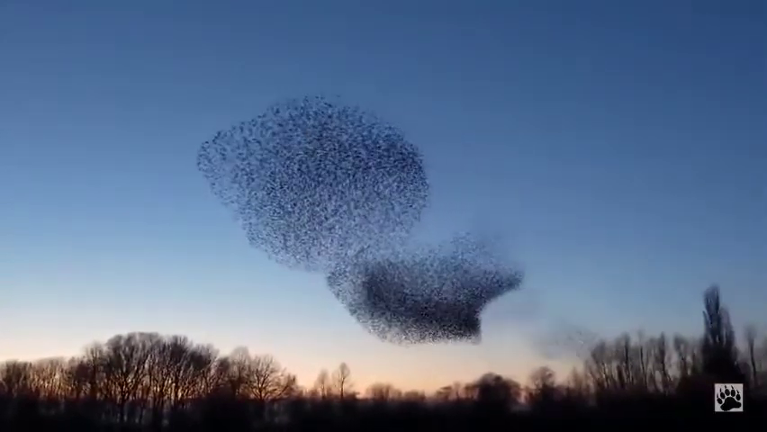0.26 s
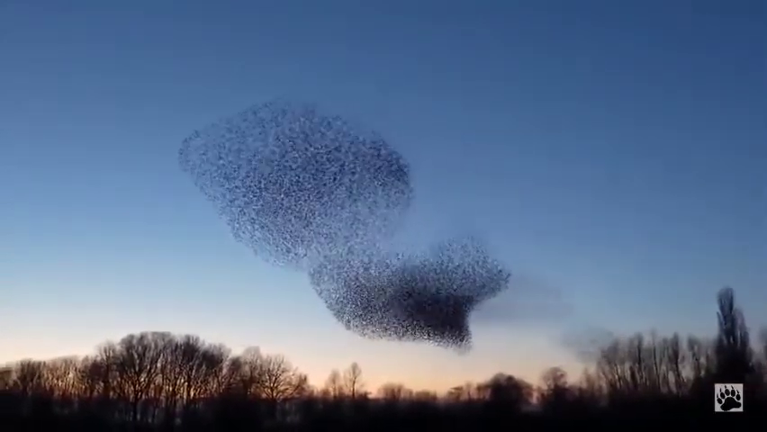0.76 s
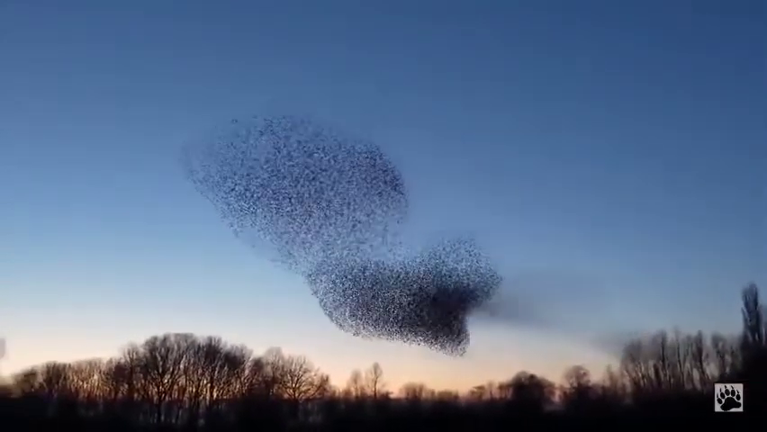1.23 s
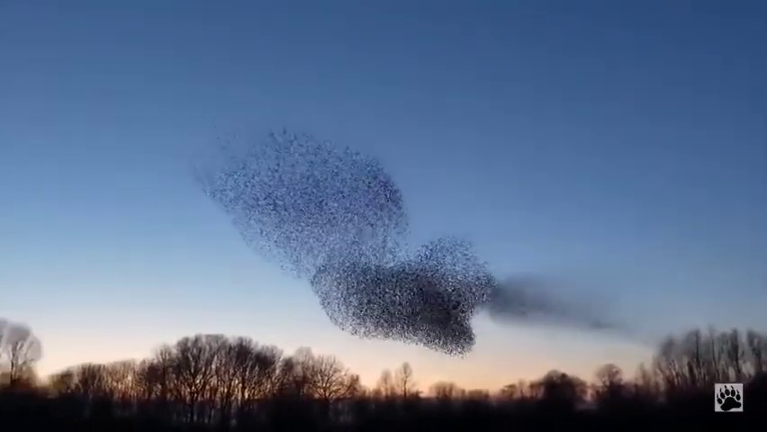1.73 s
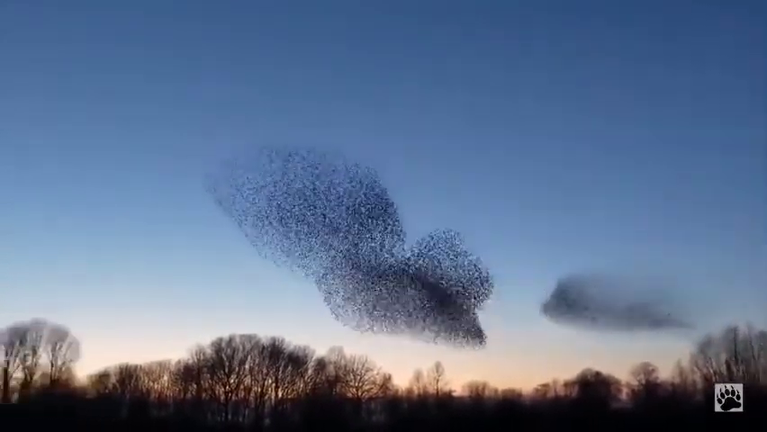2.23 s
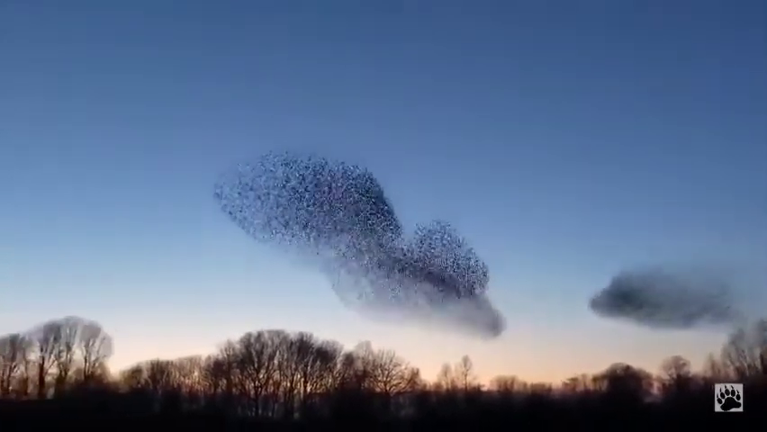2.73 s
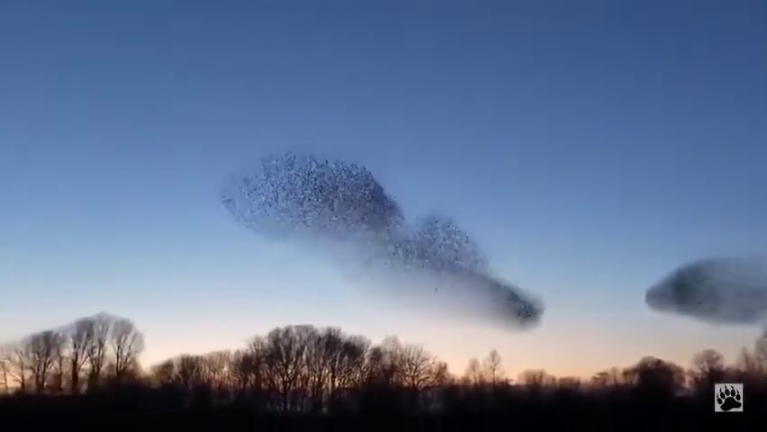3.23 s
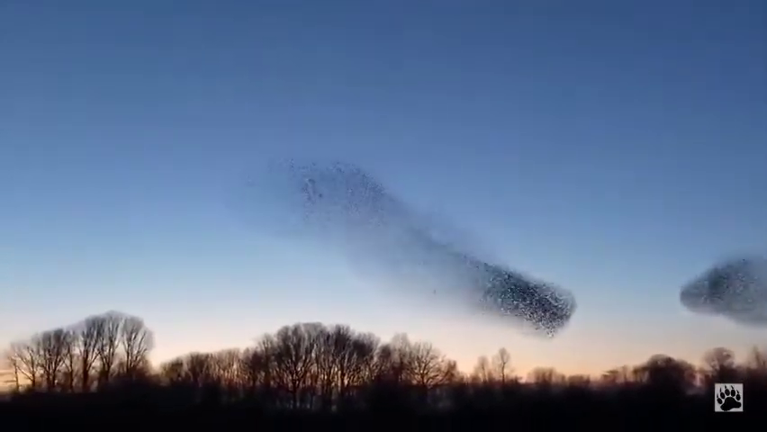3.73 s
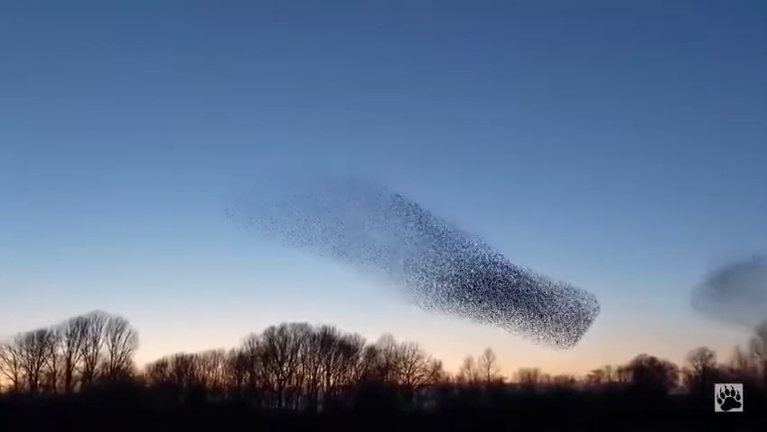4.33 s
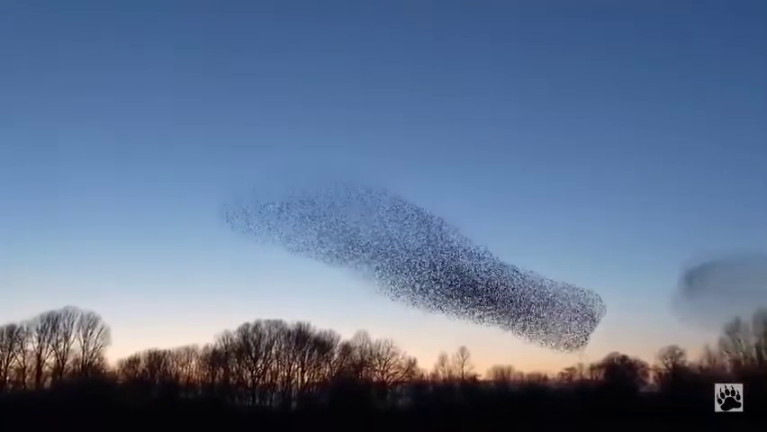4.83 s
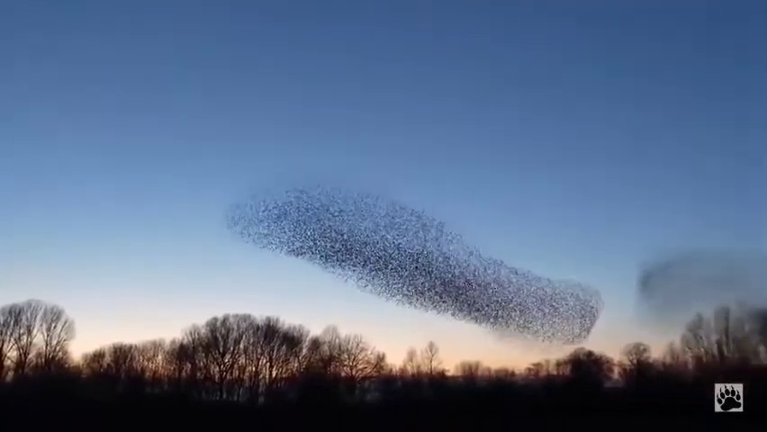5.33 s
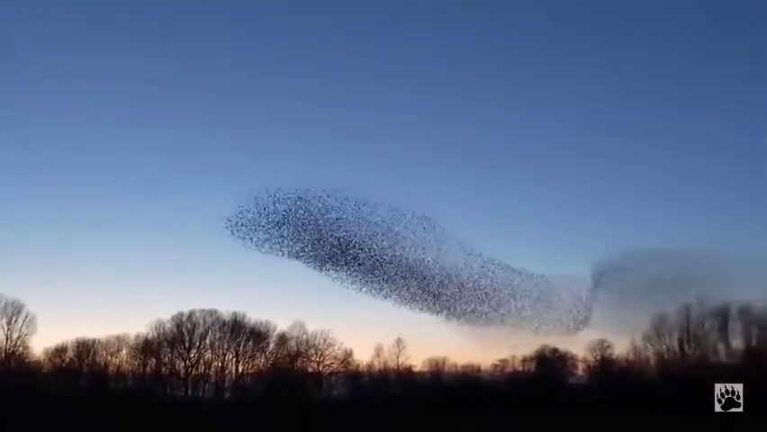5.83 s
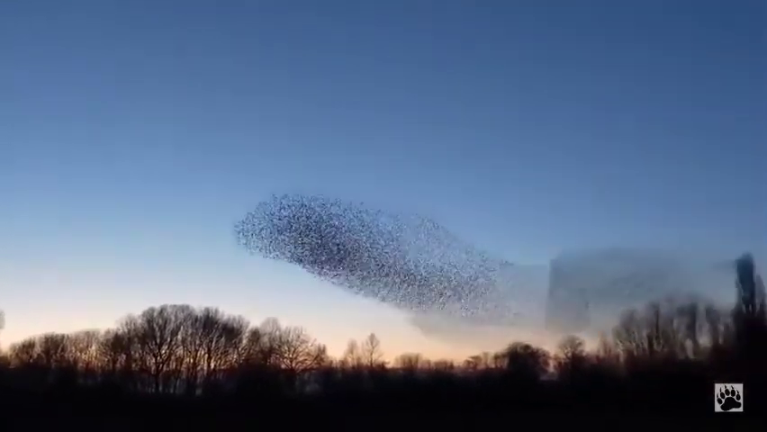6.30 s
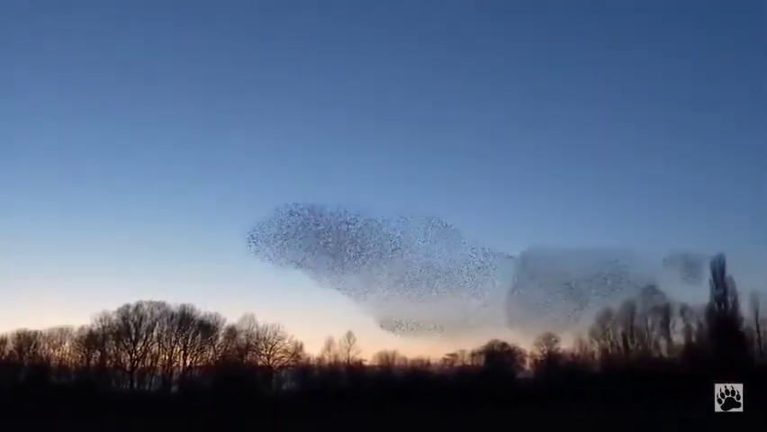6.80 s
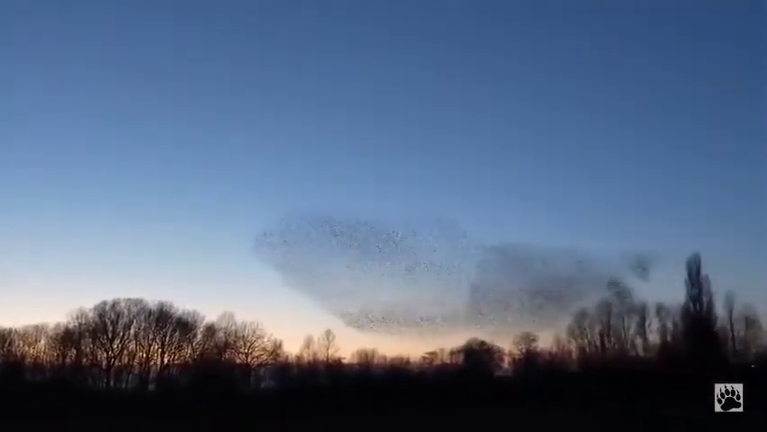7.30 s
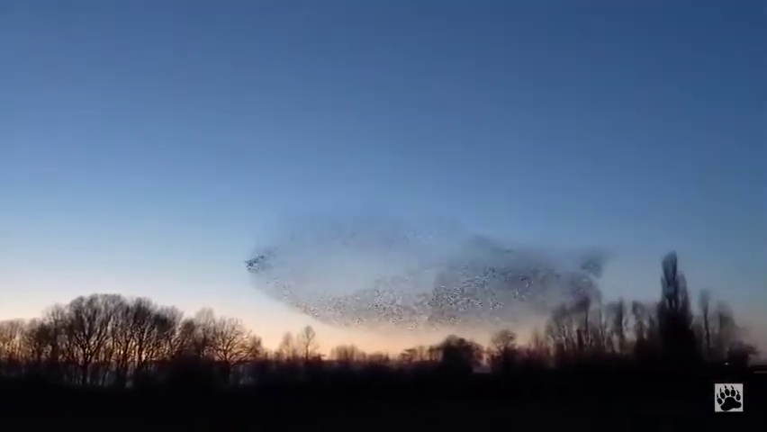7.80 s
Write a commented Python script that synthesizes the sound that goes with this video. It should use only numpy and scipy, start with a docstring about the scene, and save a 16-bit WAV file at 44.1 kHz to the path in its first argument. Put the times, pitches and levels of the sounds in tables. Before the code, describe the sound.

Outdoors by trees at dusk, a large starling flock keeps up a dense, wavering twitter. Nearer birds open with harsh high buzzes and short whistles, then sliding whistles and occasional squawks. Around two and a half seconds a fast dry rattle runs for half a second. More buzzes, warbles and bill ticks follow. A faint hiss of wings and leaves lies underneath, with a short scattered tree echo and a small microphone's thin bass.

```python
"""A field at dusk, beside a roost of starlings. Near birds whistle, buzz, rattle, squawk and tick.
Whistles are gliding tones, buzzes are pulsed tones, squawks are stacks of harmonics and ticks are noise snaps.
Thousands of far calls blur into chatter over a soft rush of wings and leaves and bands of air noise.
Trees return a short scattered echo, made with a decaying tail of noise."""
import sys
import numpy as np
from scipy import signal
from scipy.fft import rfft, irfft, next_fast_len
from scipy.io import wavfile
from scipy.ndimage import uniform_filter1d

SR = 44100
rng = np.random.default_rng(int(sys.argv[2]) if len(sys.argv) > 2 else 0)


def materialize(psi):
    """Save the field psi as 16-bit PCM at rate SR to the path in sys.argv[1].

    A 1-D psi becomes a single channel; in a 2-D psi each row is a channel.
    """
    bounded = np.clip(np.atleast_2d(psi).T, -1, 1)
    quanta = np.round(bounded * 32767).astype(np.int16)
    wavfile.write(sys.argv[1], SR, quanta)


N = 355225  # length in samples, about 8 s

# round high chips of the rattle: (t/s, level/dB before each chip's own trim, f/Hz)
HIGH_CHIPS = [(2.5072, -26, 4370), (2.5184, -26, 4530), (2.5488, -28, 4640), (2.5726, -28, 4490),
              (2.5995, -30, 5370), (2.6304, -25, 4680), (2.6559, -22.5, 4860), (2.6868, -26, 4600),
              (2.714, -25, 5390), (2.741, -22, 4600), (2.7697, -25, 4730), (2.796, -30, 4630),
              (2.829, -24, 4640), (2.8594, -32, 4630), (2.8858, -33, 4900), (2.9188, -33, 4700),
              (2.9452, -34, 5270), (2.9754, -32, 4510), (3.0006, -31, 4320), (3.0404, -33.5, 4200)]
# steep low sweeps between them: (t/s, level/dB before each chip's own trim, f/Hz before each chip's own shift)
LOW_CHIPS = [(2.5311, -25, 4020), (2.558, -27.5, 4050), (2.586, -29.5, 3470), (2.616, -26, 4270),
             (2.6444, -31, 4040), (2.6735, -24.5, 4100), (2.701, -27, 3600), (2.7312, -26, 4260),
             (2.759, -28, 4100), (2.788, -29, 3520), (2.817, -30, 4060), (2.8457, -33, 3540),
             (2.874, -30, 3440), (2.9048, -27.5, 4000), (2.9334, -32, 3710), (2.9637, -34, 4080),
             (2.9933, -32, 3520), (3.0244, -34, 4200)]


def undb(db):
    """Turn decibels into a plain multiplier."""
    return 10 ** (np.asarray(db) / 20)


def level(x, db):
    """Scale a sound to an rms level in dB."""
    return x * undb(db) / np.sqrt(np.mean(x ** 2))


def walk(rate):
    """A smooth random wander: levels held for 1 / rate seconds, smoothed twice, with a spread near 1."""
    hold = max(int(SR / rate), 2)
    steps = np.repeat(rng.standard_normal(N // hold + 1), hold)
    smooth = uniform_filter1d(uniform_filter1d(steps, hold), hold)
    return 1.316 * smooth[:N]


def colour(x, points):
    """Make some pitches louder and others softer, following (Hz, dB) points."""
    hz, db = np.transpose(points)
    size = next_fast_len(N)
    bins = np.arange(size // 2 + 1) * SR / size + 1  # the + 1 avoids log(0)
    gain = undb(np.interp(np.log(bins), np.log(hz), db))
    return irfft(rfft(x, size) * gain, size)[:N]


def add(out, start, x):
    """Mix x in at a time in seconds."""
    i = max(int(start * SR), 0)
    out[i:i + len(x)] += x[:max(N - i, 0)]


def sine(hz, turn=0.):
    """Tone of rms 1 that follows a pitch curve; turn is its starting point in the cycle."""
    return np.sqrt(2) * np.sin(2 * np.pi * (np.cumsum(hz) / SR + turn))


def arch(size, edge):
    """Loudness shape with rounded ends; a small edge gives a flat top."""
    return np.sin(np.pi * (np.arange(size) + .5) / size) ** edge


def arc(u, first, middle, last):
    """Parabola through three values at u = 0, .5 and 1."""
    return first * (1 - u) * (1 - 2 * u) + middle * 4 * u * (1 - u) + last * u * (2 * u - 1)


def chip(hz, length, rise, turn=0., bend=np.zeros(SR)):
    """A short tone, peak 1, sliding by the fraction rise each side of hz; bend adds an unsteady pitch."""
    u = np.linspace(-1, 1, int(length * SR))
    tone = sine(hz * (1 + rise * u + bend[:len(u)]), turn)
    return tone * arch(len(u), 0.96) / np.sqrt(2)


def band_noise(hz, ratio):
    """Noise from hz / ratio to hz * ratio, fading on both sides."""
    edges = [(hz / ratio ** 2, -50), (hz / ratio, -3), (hz, 0), (hz * ratio, -3), (hz * ratio ** 2, -50)]
    return colour(rng.standard_normal(N), edges)


def whistles():
    """Each whistle is one gliding, nearly pure tone whose pitch and strength tremble."""
    # simple whistles, one arc each:
    # (t/s, length/s, first f/Hz, middle f/Hz, last f/Hz, level/dB, swell from start to end/dB)
    simple_whistles = [ (0.0, 0.023, 2600, 2640, 2600, -43, -6), (0.038, 0.068, 2780, 3000, 3220, -41, 0),
                       (4.17, .06, 4550, 4650, 4750, -47, -6), (.119, 0.058, 2240, 2220, 2550, -37, 2),
                       (0.435, 0.1, 1770, 1734, 1850, -39, -3), (0.514, 0.025, 2800, 2755, 2770, -33, 1),
                       (0.893, 0.035, 5460, 5500, 5800, -43.5, 0), (0.933, 0.066, 6250, 6200, 5500, -47, 1),
                       (0.79, .035, 2800, 2780, 2770, -48, -6), (1.124, 0.092, 4000, 3900, 4020, -52.5, 22),
                       (1.255, 0.13, 3480, 3360, 3320, -53, 2),
                       (1.664, 0.076, 5800, 5560, 5260, -41.5, -23),
                       (1.673, 0.073, 2630, 2650, 2680, -48, 0), (1.757, 0.058, 2563, 2630, 2600, -39, -20),
                       (1.842, 0.09, 3710, 3730, 3550, -43, -3), (1.88, 0.035, 2850, 3030, 2850, -34.5, -2),
                       (1.948, 0.046, 1885, 1946, 1990, -41, 10),
                       (2.056, 0.056, 3970, 3970, 3640, -51, -14), (1.95, 0.13, 2620, 2800, 2800, -51, 0),
                       (2.06, 0.048, 2830, 2900, 2740, -42.5, -6), (2.4, 0.17, 1147, 1118, 1140, -50, 4),
                       (2.536, 0.084, 6330, 6200, 6000, -41, 2), (2.655, 0.115, 5750, 6000, 5850, -39.5, 1),
                       (2.782, .045, 5750, 5680, 5600, -47, -2), (2.829, 0.064, 5770, 5910, 6030, -38, 15),
                       (2.908, .075, 5700, 5520, 5310, -45, 8), (2.818, 0.24, 2167, 1905, 1740, -44.5, -12),
                       (3.351, 0.059, 2880, 2330, 1890, -43.5, 4), (3.59, 0.21, 1740, 1876, 1740, -45, 0),
                       (3.888, .04, 5200, 5620, 6000, -52, -12),
                       (4.302, 0.064, 4400, 3960, 3730, -44.5, -4),
                       (4.494, 0.074, 5880, 5730, 5500, -43.5, -18),
                       (4.257, 0.039, 2680, 2380, 2220, -30, -1), (4.302, .11, 5100, 5200, 4770, -51, -4),
                       (5.15, 0.19, 1257, 1044, 810, -50, 12), (3.1, 0.2, 1153, 1082, 944, -51, -2),
                       (5.23, .04, 4320, 4600, 5200, -48, 8), (5.16, 0.15, 5350, 5480, 5630, -49.5, 4),
                       (5.278, 0.04, 2950, 2500, 2230, -36, 0), (5.423, 0.059, 2300, 4300, 4970, -48, -4),
                       (5.438, 0.16, 6060, 5920, 5770, -40.5, 3),
                       (5.546, 0.042, 6150, 6200, 5780, -38.5, -2),
                       (5.81, 0.11, 5750, 4940, 4670, -51.5, -8),
                       (5.871, 0.017, 3000, 3600, 4280, -41.5, -2),
                       (5.997, 0.038, 3080, 3190, 3000, -44.5, -17),
                       (6.198, 0.23, 3300, 3430, 3520, -53.5, -15),
                       (6.572, 0.031, 3200, 3260, 3300, -44.5, -4),
                       (6.63, 0.073, 1970, 1864, 1710, -37, -3),
                       (6.711, 0.028, 2580, 3200, 3800, -44.5, -14),
                       (7.087, 0.059, 5350, 5150, 4280, -45.5, 9), (7.238, 0.07, 8150, 7160, 6240, -54, -9),
                       (7.378, 0.12, 1610, 1745, 1770, -49, -1), (7.744, 0.076, 5300, 5050, 4530, -48, -3),
                       (7.93, 0.13, 1574, 1936, 2150, -42, 6), (8.025, .03, 4060, 4230, 4150, -43.5, 2),
                       (2.03, 0.038, 2170, 1945, 1750, -41.5, -2), (2.135, 0.068, 1753, 1610, 1770, -45, 5),
                       (2.38, .26, 1796, 1873, 1947, -47, -6), (2.45, 0.095, 2250, 2390, 2560, -50, -6),
                       (7.53, 0.067, 1140, 1088, 1010, -47.5, 0), (7.845, 0.037, 4420, 4870, 4850, -45, -2),
                       (.162, .032, 7450, 7450, 7350, -41, 6), (3.235, .09, 3850, 4080, 4650, -46, 4),
                       (1.06, 0.045, 3620, 2890, 2080, -48, 8), (7.035, .08, 2690, 2710, 2700, -54, 2),
                       (4.01, 0.045, 3750, 3720, 3760, -48, 0), (1.379, 0.087, 2100, 2680, 2580, -46, 1),
                       (1.55, .04, 3450, 3330, 3220, -43, 0), (1.722, .035, 4430, 4250, 4000, -46, -2),
                       (4.587, .02, 3400, 3000, 2650, -50, 0)]
    # winding whistles and a warble, one list of points each: (t/s, f/Hz, level/dB)
    phrases = [
        [(.296, 1840, -40), (.331, 1940, -38), (.365, 1740, -37.5), (.43, 1887, -32.5), (.479, 2133, -36.5),
         (.52, 2020, -42)],
        [(1.87, 1604, -41), (1.9, 1635, -41), (1.932, 1996, -32), (1.96, 2213, -34.5), (2.02, 2216, -42),
         (2.054, 2123, -45), (2.106, 2144, -46), (2.18, 1995, -43), (2.22, 1853, -37), (2.3, 1807, -40)],
        [(2.3, 1772, -37), (2.346, 1830, -39.5), (2.412, 1715, -44), (2.45, 1721, -39.5), (2.468, 1656, -36),
         (2.5, 1531, -42), (2.576, 1463, -49), (2.61, 1352, -47)],
        [(3.055, 4450, -52), (3.12, 4080, -51), (3.22, 3670, -51), (3.3, 3350, -48), (3.41, 2990, -53),
         (3.49, 2780, -46), (3.572, 2428, -44.5), (3.7, 2141, -51)],
        [(1.475, 5478, -61), (1.495, 5782, -45), (1.519, 5250, -48), (1.545, 5779, -38), (1.579, 5390, -34),
         (1.593, 5743, -50), (1.601, 5884, -34), (1.615, 5826, -39), (1.633, 5167, -34.5), (1.655, 5809, -48),
         (1.659, 5771, -60), (1.67, 5740, -36)],
        [(3.942, 1840, -45), (4.017, 1722, -38), (4.122, 1766, -44), (4.284, 1540, -43), (4.365, 1360, -45)],
        [(4.29, 3240, -40), (4.42, 2790, -36), (4.49, 2680, -44), (4.56, 2530, -50), (4.7, 2450, -48),
         (4.83, 2490, -46), (4.9, 2210, -45), (4.96, 2130, -51), (5.09, 2000, -44)],
        [(5.129, 1810, -43), (5.195, 2112, -39.5), (5.27, 2110, -36), (5.393, 1820, -41.5), (5.457, 1880, -43),
         (5.6, 1764, -48.5), (5.654, 1682, -31), (5.788, 1596, -54)],
        [(6.52, 1946, -45), (6.626, 2038, -43), (6.74, 2030, -39.5), (6.8, 1790, -41)],
        [(6.815, 1655, -37.5), (6.861, 1835, -37.5), (6.92, 1905, -35.5), (6.995, 1936, -40.5)],
        [(7.215, 1927, -50), (7.235, 1846, -40), (7.313, 1692, -39), (7.363, 1378, -50), (7.431, 1338, -49),
         (7.449, 1293, -40), (7.48, 1343, -58)],
        [(7.878, 5280, -57), (7.886, 5350, -47), (7.9, 5600, -43), (7.916, 5319, -41), (7.92, 5340, -37),
         (7.965, 4340, -43)],
    ]
    # regular warbles, starting at the top of a swing:
    # (t/s, length/s, first f/Hz, last f/Hz, swing each way/Hz, swings per second/Hz, level/dB)
    warbles = [(4.32, 0.195, 5980, 6180, 249.5, 12, -43)]
    out, waver, tremble, broken = np.zeros(N), walk(150), walk(220), walk(60)

    def sing(start, hz, db, edge, steady=1.):
        """Add one trembling tone; a larger steady calms it."""
        at = np.clip(int(start * SR) + np.arange(len(hz)), 0, N - 1)
        tone = sine(hz * (1 + 0.00703 * waver[at] / steady))
        shake_db = (2.0 * tremble[at] + 1.6 * broken[at]) / steady
        add(out, start, tone * undb(db + shake_db) * arch(len(hz), edge))

    for start, length, first_hz, middle_hz, last_hz, db, swell_db in simple_whistles:
        u = np.linspace(0, 1, int(length * SR))
        sing(start, arc(u, first_hz, middle_hz, last_hz), db + swell_db * (u - .5), 0.15)
    for rows in phrases:
        s, hz, db = np.transpose(rows)
        t = np.arange(s[0], s[-1], 1 / SR)
        pitch = uniform_filter1d(np.interp(t, s, hz), size=300)  # rounds the corners
        sing(s[0], pitch, np.interp(t, s, db), 0.079, steady=1.4)
    for start, length, first_hz, last_hz, swing_hz, rate, db in warbles:
        t = np.arange(0, length, 1 / SR)
        pitch = np.linspace(first_hz, last_hz, len(t)) + swing_hz * np.cos(2 * np.pi * rate * t)
        sing(start, pitch + 90 * walk(120)[:len(t)], db, 0.43)
    return out


def buzzes():
    """The voice opens and shuts many times a second; the pitch slides inside every pulse."""
    # (t/s, length/s, first f/Hz, last f/Hz, level/dB, average pulses per second/Hz, glide in each pulse/Hz)
    pulsed_calls = [(0, 0.175, 5650, 4550, -33.5, 130, -800), (0.175, 0.045, 4400, 4200, -33.5, 137, -500),
                    (0.19, 0.035, 6950, 6800, -41, 130, 500), (0.262, 0.118, 4700, 3850, -29, 135, 1000),
                    (0.739, 0.097, 5480, 4220, -30.5, 143, -500), (0.89, 0.16, 4430, 4480, -43, 38, 1600),
                    (2.17, 0.17, 6670, 5900, -45.5, 127, 892), (2.758, 0.089, 7170, 7700, -43.5, 140, 900),
                    (3.329, 0.077, 5420, 5600, -46, 110, 500), (3.713, 0.091, 4600, 3936, -25.5, 145, 450),
                    (3.804, 0.09, 1935, 1890, -33, 140, 305), (4.049, .08, 6000, 6220, -52, 150, 402),
                    (4.26, 0.042, 3750, 3050, -32, 150, -500), (4.259, 0.042, 5200, 4200, -38, 210, -900),
                    (4.228, .03, 3100, 3900, -38, 150, 700), (.246, .024, 3500, 4900, -31, 90, 600),
                    (5.822, 0.078, 1800, 1590, -37.5, 106, 400), (4.773, 0.057, 5460, 5720, -44, 150, 500),
                    (5.27, 0.13, 5320, 5550, -42, 105, 500), (6.499, 0.058, 3800, 3810, -40, 140, 1200),
                    (6.633, 0.095, 5520, 5450, -38.5, 92, 500), (5.626, 0.16, 4370, 3540, -42.5, 136, 500),
                    (7.018, .14, 1745, 1710, -33, 170, 350), (6.735, 0.16, 6300, 6300, -48, 93, 600),
                    (6.84, 0.24, 1650, 1560, -40, 95, 300), (7.533, 0.078, 7630, 7560, -43.5, 79, 400),
                    (7.967, 0.065, 4200, 4230, -40, 62, 200), (.065, .03, 7500, 7300, -48, 150, 898),
                    (.15, 0.15, 8400, 7900, -52, 120, 600), (.315, .03, 7300, 7300, -47, 130, 500),
                    (.43, .05, 5500, 6800, -45, 85, 900), (2.53, .075, 6500, 7700, -50, 100, 500),
                    (2.61, .04, 6300, 7160, -45, 120, 600), (6.866, 0.039, 5450, 5700, -44, 100, 200),
                    (7.042, 0.11, 1560, 1535, -42, 60, 100)]
    out, uneven, scatter = np.zeros(N), walk(60), walk(300)
    for start, length, first_hz, last_hz, db, rate, glide_hz in pulsed_calls:
        at = int(start * SR) + np.arange(int(length * SR))
        phase = np.cumsum(rate * (1 + 0.25 * uneven[at])) / SR % 1  # 0 to 1 in each pulse
        # the wander is read backwards here, so pitch and strength move separately
        pitch = np.linspace(first_hz, last_hz, len(at)) * (1 + 0.034 * scatter[-at])
        pitch = pitch + glide_hz * (phase - .5)
        pulse = np.sin(np.pi * phase) ** 1.25 * undb(db + 4 * np.tanh(scatter[at]))
        add(out, start, sine(pitch) * pulse * arch(len(at), 0.55))
    return out


def rattle():
    """Round high chips alternate with steep low upward sweeps, each with weaker chips; the throat rasps."""
    out, rasp = np.zeros(N), walk(500)
    for s, db, hz in HIGH_CHIPS:
        u = rng.random(2)
        add(out, s - .001, undb(db - 2.0) * chip(hz, 0.0055, 0.043))
        behind = chip(hz * (0.9 + 0.15 * u[1]), 0.0042, 0.14)
        add(out, s + 0.005 + 0.002 * u[0], undb(db - 6.5) * behind)
    for s, db, hz in LOW_CHIPS:
        u = rng.random(2)
        add(out, s - .001, undb(db - 1.5) * chip(hz * .97, 0.005, 0.19))
        add(out, s - .004, undb(db - 10) * chip(hz * 0.8, 0.004, 0.19))  # the sweep's lower lead-in
        behind = chip(hz * (1.05 + 0.2 * u[1]), 0.0039, 0.16)
        add(out, s + 0.005 + 0.002 * u[0], undb(db - 4) * behind)
        add(out, s + 0.009, undb(db - 9) * chip(hz * (0.815 + 0.2 * u[0]), 0.004, .2))
    return out * undb(1.6 * rasp)


def squawks():
    """A rough stack of seven harmonics, strongest near the throat resonance at 2300 Hz."""
    # (t/s, length/s, first f/Hz, last f/Hz, level/dB)
    harsh_calls = [(0.095, 0.083, 760, 805, -41.5), (1.049, 0.055, 841, 814, -38.5),
                   (1.753, 0.076, 866, 792, -41), (4.238, 0.074, 860, 769, -37),
                   (4.702, .16, 820, 693, -41.5), (5.276, 0.053, 808, 780, -39.5),
                   (5.802, 0.043, 828, 880, -46)]
    out, rasp = np.zeros(N), walk(400)
    for start, length, first_hz, last_hz, db in harsh_calls:
        at = int(start * SR) + np.arange(int(length * SR))
        pitch = np.linspace(first_hz, last_hz, len(at)) * (1 + 0.0655 * rasp[-at])
        stack = 0
        for k in range(1, 8):
            octaves_away = np.log2(k * first_hz / 2300)
            stack = stack + sine(k * pitch) * undb(-14 * octaves_away ** 2)
        add(out, start, level(stack, db) * undb(6.5 * np.tanh(rasp[at])) * arch(len(at), 0.7))
    return out


def ticks():
    """Dry bill ticks: bright snaps of noise that die away in a millisecond or two."""
    # (t/s, starting level/dB before the treble tilt)
    bill_ticks = [(1.9694, -49), (3.9704, -50), (4.1101, -48), (6.5715, -48), (6.6338, -41), (6.6608, -40),
                  (6.7274, -42), (6.8594, -46)]
    out, t = np.zeros(N), np.arange(int(.01 * SR)) / SR
    clatter = [(s, db - 25) for s, db, hz in HIGH_CHIPS + LOW_CHIPS]  # every chip of the rattle snaps too
    for s, db in list(bill_ticks) + clatter:
        add(out, s, undb(db) * rng.standard_normal(len(t)) * np.exp(-t / .0012))
    return colour(out, [(1500, -15), (8000, 0)])


def chatter(band, count, long_s, short_share, waver):
    """Many far calls at chance moments: wavering, raspy glides, mostly falling, and short steep chips."""
    centre_hz, spread = band
    out, bend, rasp = np.zeros(N), waver * walk(45), undb(3.23 * walk(170))
    even = rng.random((count, 5))
    bell = np.clip(rng.standard_normal((count, 3)), -1.8, 1.8)
    for (when, kind, span, turn, voice), (place, slide, db) in zip(even, bell):
        short = kind < short_share
        length = (.01 if short else long_s) * (0.398 + 1.212 * span)
        rise = 0.101 * slide if short else 0.04 * slide - .02
        at = int(voice * (N - SR))  # each call borrows its own stretch of the wanders
        call = chip(centre_hz * np.exp(spread * place), length, rise, turn, bend[at:])
        # voices away from the middle of the range are weaker
        gain = undb(1.7 * db - 2.68 * place ** 2)
        add(out, when * N / SR - .05, gain * call * rasp[at:at + len(call)])
    return level(out, 0)


def rush():
    """Thin treble hiss of wings and leaves: narrow noise bands that flutter together and singly."""
    out, flutter = 0, 1.8 * walk(22) + 1.6 * walk(70)
    for hz in 3000 * 2 ** np.arange(0, 2.4, .125):
        out = out + band_noise(hz, 1.09) * undb(flutter + 4.4 * walk(48))
    hiss = colour(out, [(2500, -19), (5000, 8.5), (8000, 0.5), (11000, -3.5), (15000, -5.5)])
    return level(hiss, 0)


def air():
    """Evening air and distant flock: noise bands that swell together and flicker alone."""
    # tone of the air, before its overall level is set: (f/Hz, level/dB)
    air_tone = [(24, -60), (45, -40), (80, -65), (130, -31), (257, -16.5), (600, -7), (1000, -3),
                (1800, -1), (2900, -8.5), (4400, -21), (8500, -55), (11000, -60)]
    # rise and fall of the low murmur, with throaty noise under two squawks;
    # only changes around the average count: (t/s, level/dB)
    low_murmur = [(0.0, -55.5), (0.11, -50), (0.36, -58.5), (0.45, -55.5), (2.15, -58.5), (2.2, -54.5),
                  (2.73, -57), (4.24, -56.5), (4.28, -44), (4.33, -56), (5.25, -56.5), (5.31, -50.5),
                  (5.36, -57.5), (6.43, -58), (6.95, -56), (7.06, -58.5), (8.0, -54), (8.05, -52.5)]
    out, swell = 0, 1.6 * walk(14)
    s, db = np.transpose(low_murmur)
    low_murmur_db = np.interp(np.arange(N) / SR, s, db - np.mean(db))
    for hz in 40 * 2 ** np.arange(0, 8.8, .5):
        flicker = (4.2 if hz < 1000 else 2.6) * walk(30)
        under_voices = 400 < hz < 1000  # only these bands follow the low murmur
        out = out + band_noise(hz, 1.243) * undb(swell + flicker + low_murmur_db * under_voices)
    return level(colour(out, air_tone), -46.3)


def scattered_echo(x, t60):
    """Blur a sound with a noise tail that starts after 6 ms and falls by 60 dB in t60 seconds."""
    t = np.arange(int(.4 * SR)) / SR
    tail = rng.standard_normal(len(t)) * np.exp(-np.log(1000) * t / t60) * (t > .006)
    return signal.fftconvolve(x, tail / np.sqrt(np.sum(tail ** 2)))[:N]


def scene():
    """Mix near birds, far flock, echo from the trees, wings and air, then spread them to stereo."""
    # far flock: (t/s, low voices level/dB, high voices level/dB, wing rush level/dB)
    flock = [(0.0, -41.5, -46, -52.5), (0.43, -42, -47.5, -50.5), (0.85, -39, -45, -54),
             (1.12, -44.5, -51.5, -60), (1.79, -44, -42.5, -54), (1.97, -49.5, -50, -59),
             (2.4, -41.5, -49.5, -60.5), (2.55, -48, -43.5, -53.5), (2.69, -47.5, -49.5, -51),
             (2.8, -48.5, -40.5, -50.5), (3.0, -42.5, -50.5, -57), (3.32, -46, -47.5, -58.5),
             (4.15, -39.5, -47.5, -59), (4.46, -48.5, -50.5, -56.5), (4.95, -42, -46.5, -60.5),
             (5.56, -46, -48.5, -56.5), (5.76, -42, -47.5, -59), (6.19, -48, -52, -60),
             (6.7, -44.5, -45, -52), (6.93, -43.5, -55, -59.5), (7.11, -44.5, -52, -61),
             (7.55, -43, -45, -50.5), (7.821, -45.5, -47.5, -54.5), (8.05, -43.5, -36.5, -56)]
    # pitch ranges of the far voices: (centre f/Hz, spread as log ratio)
    low_voices = (1689, .33)
    high_voices = (3703, .34)
    # strength of the left-right difference against the middle: (f/Hz, level/dB)
    side_tone = [(25, -24), (60, -8), (140, -20), (350, -35), (700, -38), (1800, -48), (2450, -21),
                 (4500, -17.5), (7000, -12), (9000, -8.5), (14000, -5.5)]
    t = np.arange(N) / SR
    s, *columns = np.transpose(flock)
    low_db, high_db, wing_db = (np.interp(t, s, column) for column in columns)

    songs = whistles() + buzzes() + rattle()
    # loud voices are not pure: a weak second harmonic grows with strength
    songs += 0.47 * colour(songs ** 2, [(300, -80), (1500, -34), (3000, 21), (15000, -3.5)])
    near = songs + squawks() + ticks()
    far = undb(low_db) * chatter(low_voices, count=1000, long_s=0.11, short_share=.3, waver=0.016)
    far += undb(high_db) * chatter(high_voices, count=5200, long_s=.035, short_share=.6, waver=.04)
    wings = undb(wing_db) * rush()

    near_echo = undb(-8.5) * scattered_echo(near, 0.31)
    far_echo = undb(-9) * scattered_echo(far, 0.39)
    mid = near + near_echo + far + far_echo + wings + air()
    # stereo width: left and right differ by a scattered copy, mostly in the treble and deep bass
    side = colour(scattered_echo(mid, 0.047), side_tone)
    return np.array([mid + side, mid - side])


def record(dry):
    """The small microphone loses the deep bass; the recorder cuts the top."""
    bass_cut_hz, top_hz = 95, 15100
    bass_cut = signal.butter(1, bass_cut_hz, "high", fs=SR, output="sos")
    top_cut = signal.ellip(10, .2, 70, top_hz, fs=SR, output="sos")
    thin = signal.sosfilt(bass_cut, dry)
    return signal.sosfilt(top_cut, thin)


dry = scene()
out = record(dry)
materialize(out)
```